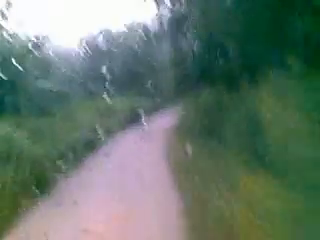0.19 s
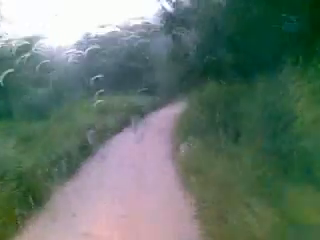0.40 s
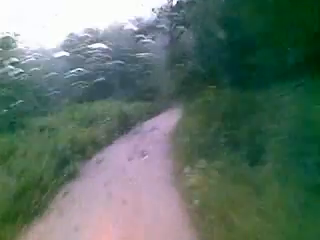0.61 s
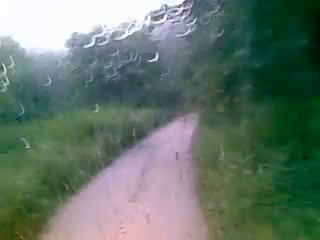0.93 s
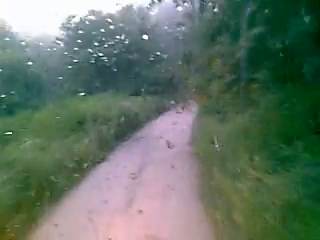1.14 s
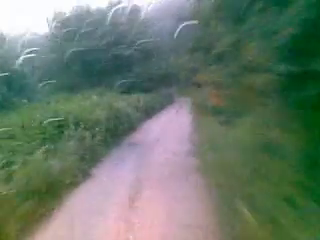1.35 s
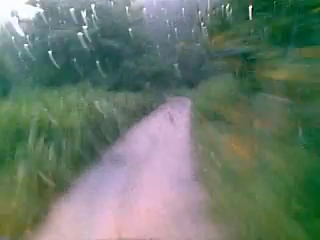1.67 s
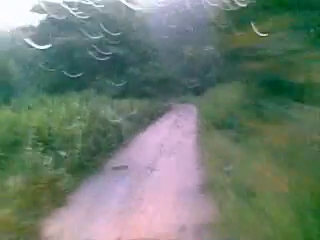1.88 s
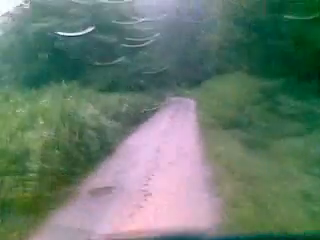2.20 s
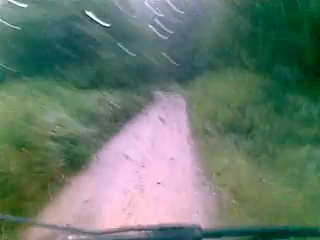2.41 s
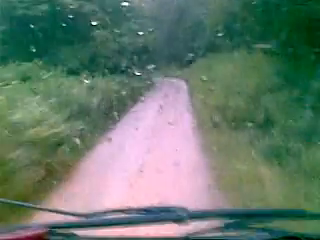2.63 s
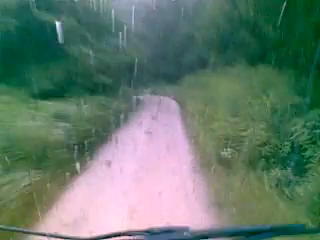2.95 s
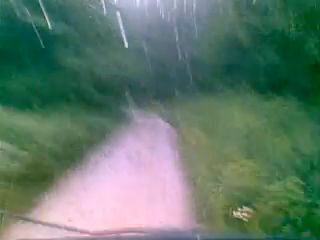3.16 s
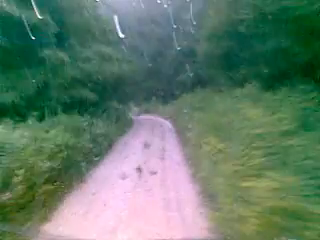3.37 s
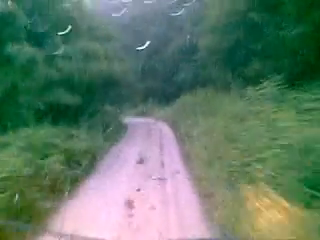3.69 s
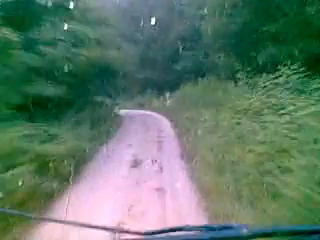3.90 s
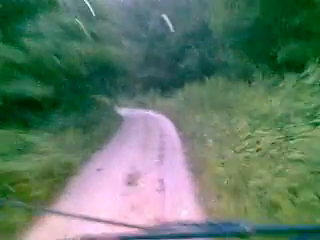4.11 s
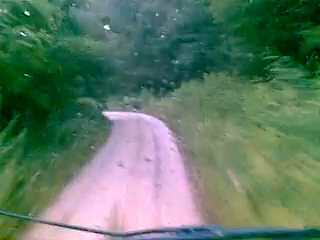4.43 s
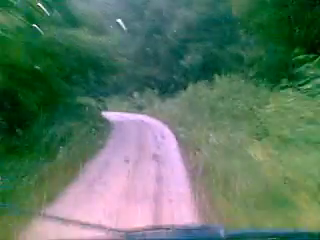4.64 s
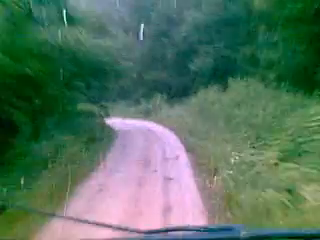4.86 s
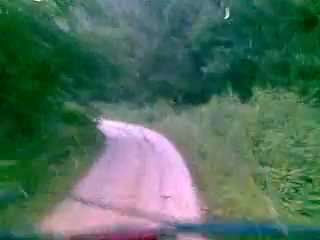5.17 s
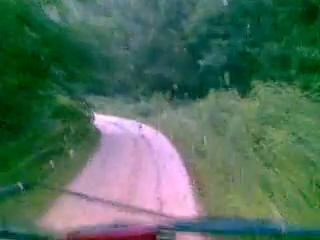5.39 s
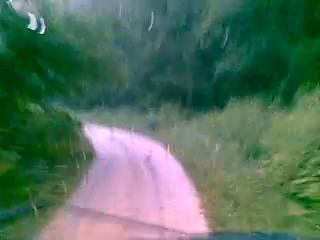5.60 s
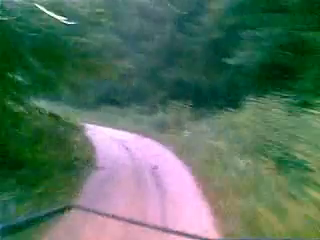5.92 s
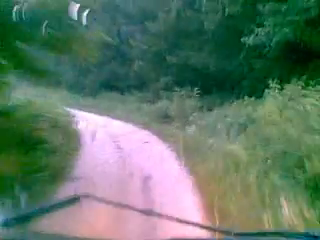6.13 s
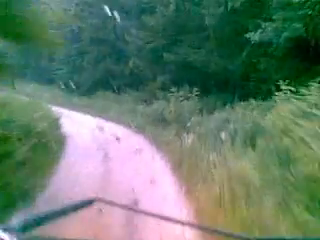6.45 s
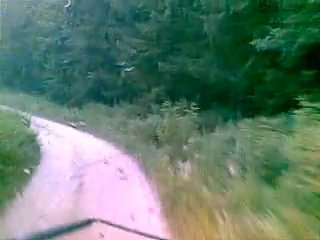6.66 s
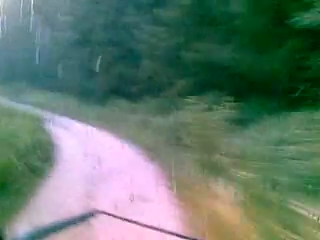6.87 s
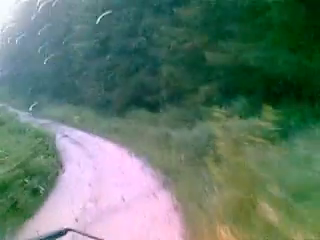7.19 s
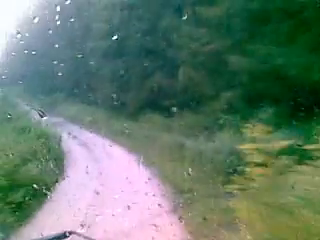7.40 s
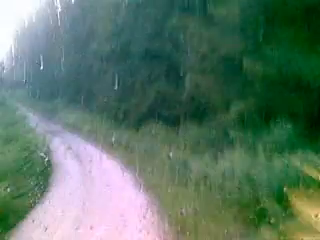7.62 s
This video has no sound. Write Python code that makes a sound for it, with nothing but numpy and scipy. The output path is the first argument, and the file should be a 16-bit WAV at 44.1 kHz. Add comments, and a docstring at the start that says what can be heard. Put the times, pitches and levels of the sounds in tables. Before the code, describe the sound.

A heavy diesel truck rumbles and clatters along a wet, rough track, heard from the cab with metal rattling and one pothole clunk.

```python
"""Inside the cab of a heavy diesel truck on a wet, rough forest track.
The cab booms with the crankshaft, gears whine, and the engine clatters, one injector knocking each
cycle until the throttle eases. The road roars and the wet tyres hiss. Bumps shake a loose metal
fitting and the cab trim, and something wet swishes over the body. Near the end come a faint squeal
in a bend and the clunk of one pothole."""
import sys
import numpy as np
from scipy import signal
from scipy.fft import rfft, irfft
from scipy.io import wavfile

SR = 44100
rng = np.random.default_rng(int(sys.argv[2]) if len(sys.argv) > 2 else 0)


def store_pcm(level_fs):
    """Save levels as 16-bit WAV."""
    pcm = np.round(np.clip(level_fs, -1, 1) * 32767).astype(np.int16)
    wavfile.write(sys.argv[1], SR, np.atleast_2d(pcm).T)


N = 344851
T = np.arange(N) / SR

# Each row: time in seconds, engine cycles per second (a cycle is two turns of the crankshaft).
ENGINE_SPEED = [(0.0, 11.33), (0.8, 11.153), (1.6, 10.989), (2.2, 10.876), (3.0, 10.855), (3.6, 10.875),
                (4.2, 10.871), (4.9, 10.898), (5.3, 10.86), (5.7, 10.575), (6.1, 10.327), (6.5, 10.42),
                (7.0, 10.34), (7.4, 10.24), (7.82, 10.2)]
# The injector knock follows how hard the engine works. Each row: time in seconds, level in dB.
KNOCK_LEVELS = [(0, -29.5), (1, -31), (1.4, -33), (2, -31.5), (2.4, -28.2), (2.85, -27.2), (3.2, -26.7),
                (3.75, -27.7), (4.2, -26.4), (5.1, -26.1), (5.35, -25.8), (5.55, -25.6), (5.65, -33),
                (5.85, -34), (6.1, -40), (6.6, -44), (7.82, -51)]
# The body shakes on its springs and the road roars through the cab panels.
# Each row: time in seconds, shake level in dB, roar level in dB.
SHAKE_AND_ROAR = [(0, -29.5, -36), (1.1, -25, -35.5), (1.5, -37, -38.5), (2, -32, -38), (3.1, -31, -37.5),
                  (3.5, -29.5, -35.5), (4.15, -32.5, -40), (4.85, -30, -37), (5.7, -24.5, -38),
                  (6.1, -37, -35.5), (7.2, -36.5, -38.5), (7.82, -22, -39.5)]
# Engine clatter and tyre spray. Each row: time in seconds, then the relative level of each in dB.
CLATTER_AND_SPRAY = [(0, -41, -54), (.6, -42.5, -55), (1.1, -43, -55.5), (1.8, -46, -59.5),
                     (2.3, -45.5, -56), (3.1, -43, -56), (3.7, -45, -58.5), (4.4, -43.5, -56.5),
                     (4.9, -42, -54.5), (5.4, -43, -52.5), (5.8, -43.5, -57.5), (6.2, -47, -57.5),
                     (6.7, -45.5, -60), (7, -44.5, -50.5), (7.3, -50.5, -56), (7.82, -48.5, -56)]


def gain_of(db):
    """Turns decibels (dB) into a number to multiply a sound by."""
    return 10 ** (np.asarray(db) / 20)


def evened(x):
    """Scales a signal so that its average strength (rms) is 1."""
    return x / np.sqrt(np.mean(x ** 2) + 1e-20)


def curve(rows, column=1):
    """Joins the points of a time table with straight lines, giving a value for every sample."""
    rows = np.asarray(rows)
    return np.interp(T, rows[:, 0], rows[:, column])


def add(mix, start, sound):
    """Adds a sound to the mix at a start time in seconds."""
    part = mix[max(round(start * SR), 0):][:len(sound)]
    part += sound[:len(part)]


def coloured(x, colour, size=16384):
    """Filters a sound by a colour: a table of how strong each frequency is next to the others."""
    hz, db = np.transpose(colour)
    log_gain = np.log(gain_of(np.interp(np.log(np.fft.rfftfreq(size, 1 / SR) + 1), np.log(hz), db)))
    cepstrum = irfft(log_gain)
    cepstrum[1:size // 2] *= 2  # folded in half, so the filter rings only after a hit
    cepstrum[size // 2 + 1:] = 0
    response = irfft(np.exp(rfft(cepstrum)))
    return signal.oaconvolve(x, response / np.linalg.norm(response))[:len(x)]


def noise(colour):
    """Steady noise of strength 1 in the given colour."""
    return evened(coloured(rng.standard_normal(N + SR), colour)[SR:])


def wander(rate):
    """A smooth random wobble of strength 1, moving up to about `rate` times a second."""
    hz = np.fft.rfftfreq(2 ** 19, 1 / SR)[:2 ** 14]
    spectrum = np.exp(2j * np.pi * rng.random(len(hz)) - np.minimum(hz / rate, 10) ** 2)
    return evened(irfft(spectrum, 2 ** 19)[:N])


def whistle(hz, width_hz, purity):
    """A tone that follows the pitch curve hz; the lower its purity (0 to 1), the more noise blurs it."""
    pole = np.exp(-np.pi * width_hz / SR)
    blur = rng.standard_normal(N) + 1j * rng.standard_normal(N)
    for _ in range(2):
        blur = signal.lfilter([1 - pole], [1, -pole], blur)
    strength = purity + (1 - purity) * blur / np.std(blur)
    return evened((strength * np.exp(2j * np.pi * np.cumsum(hz) / SR)).real)


def burst(t60, tail_db, tail_t60):
    """The noise of a blow, then the cab's short tail. A t60 is the seconds taken to fade by 60 dB."""
    t = np.arange(SR // 4) / SR
    return rng.standard_normal(len(t)) * (gain_of(-60 * t / t60) + gain_of(tail_db - 60 * t / tail_t60))


def cab_echo(x, echo_db, t60):
    """A sound plus its quick echoes off the glass and steel of the cab."""
    t = np.arange(SR // 5) / SR
    tail = rng.standard_normal(len(t)) * gain_of(-60 * t / t60) * (t > .003)
    return x + gain_of(echo_db) * signal.oaconvolve(x, tail / np.linalg.norm(tail))[:N]


def load_db():
    """How hard the engine works: 0 dB at its hardest, falling below that as the throttle eases."""
    return curve(KNOCK_LEVELS) - np.max(curve(KNOCK_LEVELS))


def engine_hum(cycles):
    """The cab's boom, the exhaust note and a higher drone, all swelling and sinking with the ride."""
    # Boom, exhaust note and the octave above that note. Each row: time in seconds, relative level in dB.
    boom_levels = [(0, -26), (.19, -24), (.4, -27.5), (.5, -25.5), (.76, -32), (.98, -20), (1.12, -28),
                   (1.22, -24), (1.32, -27), (1.43, -17), (1.58, -26), (1.78, -18), (2.08, -24.5),
                   (2.31, -33), (2.45, -22.5), (2.58, -28), (2.7, -21), (2.9, -33.5), (3.02, -24),
                   (3.11, -37), (3.2, -24.5), (3.44, -24.5), (3.57, -16.5), (3.74, -49), (3.9, -23),
                   (4.05, -25), (4.36, -24), (4.58, -32), (4.74, -29.5), (4.9, -39), (5.7, -29.5),
                   (6, -18.5), (6.12, -23), (6.23, -19.5), (6.5, -28.5), (6.72, -27), (6.8, -19),
                   (6.9, -15.5), (7.18, -23.5), (7.42, -18), (7.62, -25), (7.82, -24.5)]
    exhaust_levels = [(0, -38), (.57, -39.5), (3.13, -38.5), (3.24, -27.5), (3.59, -36.5), (4.27, -36),
                      (4.42, -52), (4.64, -37.5), (4.85, -48.5), (5.25, -29), (5.34, -57), (5.46, -33),
                      (5.64, -43), (5.97, -28), (6.1, -50), (6.32, -31), (6.49, -52), (6.84, -30.5),
                      (7.38, -40), (7.82, -37.5)]
    octave_levels = [(0, -46), (.4, -45), (.75, -41.5), (1.03, -41), (1.4, -44.5), (2.3, -50.5),
                     (2.7, -43.5), (3.03, -48), (3.17, -37), (3.4, -45.5), (4.1, -52), (4.5, -46),
                     (5.1, -47.5), (5.6, -47), (6, -39), (6.14, -48), (6.27, -39), (6.4, -43), (6.53, -40),
                     (6.7, -44), (7.2, -47.5), (7.5, -51.5), (7.82, -41)]
    # The tones of the drone. Each row: vibrations per engine cycle, relative level in dB.
    drone_tones = [(10, -7.5), (11, -6), (13, -5.5), (14, -3), (15, -9), (18, -3.5), (19, 1), (21, -3.5),
                   (22, -21), (23, -11.5), (24, -11.5), (29, -18), (30, -13.5), (31, -14)]
    angle = 2 * np.pi * cycles
    throb = 1 + .24 * gain_of(.4 * load_db()) * wander(11)  # jolts; steadier off the throttle
    cab_air = evened(np.sin(4.11 * angle + .36 * wander(6.8)))  # rings about four times a cycle
    boom = gain_of(curve(boom_levels) + 1.03) * throb * cab_air
    exhaust = np.zeros(N)
    for levels, multiple, wobble in (exhaust_levels, 8, .28), (octave_levels, 16, .25):
        tone = (1 + wobble * wander(9)) * np.sin(multiple * angle + .5 * wander(6))  # 8 firings a cycle
        exhaust += gain_of(curve(levels)) * evened(tone)
    sways = [wander(5.5) for _ in range(6)]
    brightness = gain_of(.33 * load_db())  # the top tones fade as the throttle eases
    drone = np.zeros(N)
    for multiple, db in drone_tones:
        swell, drift = (np.roll(sways[i], rng.integers(N)) for i in rng.permutation(len(sways))[:2])
        phase = multiple * angle + .5 * drift + 2 * np.pi * rng.random()
        tone = gain_of(db) * (1 + .55 * swell) * np.sin(phase)
        drone += tone * brightness if multiple > 17 else tone
    drone_db = curve(SHAKE_AND_ROAR, column=2) - 5  # just under the road roar
    return boom + exhaust + gain_of(drone_db) * evened(drone)


def roof_panel():
    """The engine makes the roof hum, at a pitch that follows its speed."""
    # Each row: time in seconds, level in dB.
    levels = [(0, -46), (1, -50.5), (1.15, -39.5), (1.39, -55.5), (1.61, -43.5), (1.91, -53.5), (2.28, -42),
              (2.57, -38.5), (2.68, -61), (3.05, -39), (3.2, -48), (3.7, -45), (4.2, -51), (4.4, -38.5),
              (4.5, -47), (4.88, -37), (5.07, -49.5), (5.49, -46), (5.6, -51), (6.05, -51), (7.82, -53.5)]
    speed = curve(ENGINE_SPEED)
    hz = 232.3 * speed / np.median(speed)
    return gain_of(curve(levels)) * whistle(hz, width_hz=35, purity=.76)


def engine_clatter(cycles):
    """Injectors and valves tap the same round every cycle; one injector knocks far louder under load."""
    # Each row: place in the cycle from 0 to 1, relative level of the tap in dB.
    tap_round = [(0.041, -5.5), (.088, 11.5), (.166, 8), (0.196, 6.5), (.232, 5), (.272, 10.5),
                 (.303, 12.5), (.382, 5.5), (.406, 11.5), (.453, 10.5), (.476, 10), (0.537, 0), (.6, 7),
                 (0.646, -0.5), (.69, 7), (.742, 12.5), (.81, 3.5), (.892, 12.5), (0.966, 12.5)]
    # Taps heard through the cab wall, and the dense wash of the other engine parts.
    # Each row: frequency in Hz, relative level in dB.
    tap_colour = [(200, -23.5), (450, -5.5), (600, -3), (800, -12), (930, 5), (1060, 6.5), (1280, -2),
                  (1430, -8.5), (1550, 1.5), (1750, -13.5), (2050, -5.5), (2600, -33), (3500, -42),
                  (6000, -44)]
    wash_colour = [(150, -21), (330, -2.5), (520, -0.5), (800, -2), (930, 1), (1100, -11.5), (1280, 3.5),
                   (1450, -6), (1750, -6), (2300, -13), (2850, -17.5), (3800, -22), (4900, -29.5),
                   (9000, -45)]
    cycle_numbers = np.arange(-1, int(cycles[-1]) + 1)
    taps, kicks = np.zeros(N), np.zeros(N)
    for place, db in tap_round:
        timing, size = rng.standard_normal((2, len(cycle_numbers)))
        at = np.searchsorted(cycles, cycle_numbers + place + .0021 * timing)
        heard = (at > 0) & (at < N)
        taps[at[heard]] += gain_of(db + .32 * size[heard])
    level_db = curve(CLATTER_AND_SPRAY)
    taps = coloured(evened(taps) * gain_of(level_db - 3.5 + .49 * load_db()), tap_colour)
    # Each knock rings the engine block for a few swings, with a little dry noise on top.
    knock_hz, rise_s = 1120, .0016
    at = np.searchsorted(cycles, cycle_numbers[1:])
    kicks[at] = gain_of(curve(KNOCK_LEVELS)[at] + .5 * rng.standard_normal(len(at)))
    t = np.arange(SR // 100) / SR
    swell = (t / rise_s * np.exp(1 - t / rise_s)) ** 4
    contact = .15 * signal.oaconvolve(kicks, swell)[:N] * noise(tap_colour)
    block_ring = signal.oaconvolve(kicks, swell * np.sin(2 * np.pi * knock_hz * t))[:N]
    flicker = 1 + .057 * wander(31)
    taps = cab_echo(taps, echo_db=-7.5, t60=.12)
    wash = gain_of(level_db - 3) * evened(flicker * noise(wash_colour))
    return contact + block_ring + taps + wash


def gear_whines():
    """The gearbox and axles whine, sinking in pitch as the truck slows."""
    # One list for each whine. Each row: time in seconds, pitch in Hz, level in dB.
    whines = [
        [(0, 1072, -49), (1.1, 1061, -53.5), (1.6, 1050, -55), (2.1, 1025, -71)],
        [(1.5, 926, -64), (2.3, 924.6, -53), (4, 928, -53), (5.5, 933, -51), (6.1, 912, -63), (6.5, 918, -59),
         (6.72, 922, -51), (7.15, 911, -51.5), (7.55, 902, -57), (7.82, 900, -56)],
        [(5.3, 1245, -86), (5.78, 1235, -49.5), (6.08, 1205, -66), (6.22, 1222, -54), (6.35, 1195, -60),
         (6.65, 1192, -57), (7, 1172, -62), (7.5, 1161, -60.5), (7.82, 1158, -58)],
        [(5.4, 1000, -80), (5.75, 990, -55), (6.15, 960, -56), (6.55, 955, -62), (7, 948, -65)],
        [(5.6, 663.5, -69), (5.85, 660, -56.5), (6.05, 668, -62), (6.22, 665, -66), (6.32, 662, -50.5),
         (6.45, 660, -54), (6.55, 657, -57.5), (6.85, 652, -54.5), (7.2, 648, -65), (7.82, 636, -70)],
        [(5.3, 330, -63), (5.9, 323, -53.5), (6.6, 321, -62), (7.1, 315, -65), (7.82, 309, -64)],
    ]
    # One number for each whine: its share of clean tone at full load, from 0 to 1.
    purities = [.64, .54, .56, .52, .64, .5]
    clearing = -.007 * load_db()  # the tones grow cleaner as the throttle eases
    out = np.zeros(N)
    for rows, purity in zip(whines, purities):
        sounding = (T >= rows[0][0]) & (T <= rows[-1][0])
        tone = whistle(curve(rows), width_hz=60, purity=purity + clearing)
        out += sounding * gain_of(curve(rows, column=2)) * tone
    return out


def wet_road():
    """Body shake and road roar jolt together, while the tyres crunch wet grit and throw up spray."""
    # The colour of each noise. Each row: frequency in Hz, relative level in dB.
    shake_colour = [(10, -41.5), (17, 12.5), (28, 13), (37, 9), (55, 2), (90, -56), (200, -91)]
    roar_colour = [(20, -16.5), (45, -9), (58, 8.5), (72, -2.5), (100, 2.5), (140, -2), (190, -7),
                   (245, -11.5), (290, -15), (370, -34.5), (600, -52.5), (1500, -48), (8000, -70)]
    grit_colour = [(250, 2), (600, 0.5), (1200, 1), (1700, -1.5), (2350, -2.5), (2900, -11), (3900, -14.5),
                   (4900, -30), (8000, -46.5)]
    spray_colour = [(2500, -16), (5000, 10.5), (6300, 13), (8300, 11), (10300, 4.5), (11500, -27),
                    (12900, -16), (14500, -29), (15700, -30)]
    jolts = wander(6.2)
    shake = gain_of(curve(SHAKE_AND_ROAR) + 1.2 * jolts) * noise(shake_colour)
    roar = gain_of(curve(SHAKE_AND_ROAR, column=2) + 1.25 * jolts) * noise(roar_colour)
    grit = gain_of(-50.5 + wander(39)) * noise(grit_colour)
    spray = gain_of(curve(CLATTER_AND_SPRAY, column=2) - 14 + 2.8 * wander(22)) * noise(spray_colour)
    return shake + roar + grit + spray


def mist():
    """Fine mist and rain hiss on the glass."""
    # Each row: time in seconds, level in dB.
    levels = [(0, -64.5), (1.8, -67), (3, -65), (4.5, -66), (5.2, -62.5), (5.8, -61), (6.3, -63.5),
              (7, -61), (7.45, -67.5), (7.82, -64)]
    # Each row: frequency in Hz, relative level in dB.
    colour = [(2000, 2.5), (5000, -6), (6500, 2.5), (8500, 2), (11000, -.5), (12800, 2.5), (14500, -3.5),
              (15700, 0.5)]
    return gain_of(curve(levels) + .5 * wander(30)) * noise(colour)


def loose_fitting():
    """A loose metal fitting hops: each landing is a dry knock, a click and a slightly different ring."""
    # Each row: start in seconds, relative knock level in dB, relative ring level in dB.
    hops = [(0.01, -46, -52), (0.05, -48, -57), (0.069, -51, -63), (0.1, -50, -51), (0.122, -47, -50),
            (0.178, -48, -47.5), (0.213, -48, -62), (.236, -55, -64), (.339, -48, -63), (0.365, -43.5, -65),
            (0.405, -44, -58), (0.443, -47, -56), (0.478, -44, -48), (0.5, -44.5, -59), (0.545, -48, -50.5),
            (0.564, -47, -51), (0.587, -43.5, -54), (0.801, -51, -59), (0.861, -42, -52), (0.952, -44, -52),
            (0.974, -42, -53), (0.994, -43, -50.5), (1.035, -49, -62), (1.052, -61, -64),
            (1.213, -42.5, -53.5), (1.238, -56, -59), (1.374, -42.5, -52), (1.501, -44, -54),
            (1.588, -49, -63), (1.607, -47, -62), (1.64, -43, -57), (1.664, -43.5, -59), (1.681, -57, -62),
            (1.904, -44, -63), (2.192, -46.5, -58), (2.367, -43, -54), (2.774, -49, -54.5),
            (3.024, -43.5, -56), (3.18, -48, -58), (3.892, -42.5, -50), (4.959, -47, -56),
            (5.072, -45.5, -47), (5.503, -46.5, -57), (5.883, -56, -62), (6.248, -48, -69),
            (6.429, -56, -63)]
    # The metal's own tones. Each row: pitch in Hz, relative level in dB, seconds to fade by 60 dB.
    metal_tones = [(2080, 16, 0.022), (2230, 12, 0.021), (3100, -5.5, .035), (3480, -7, 0.035),
                   (4010, -11, 0.041), (4450, -18, .03), (5550, -7, 0.12), (5523, 1.5, 0.037),
                   (5610, 1, 0.028), (6360, -5, 0.054), (7330, -19, 0.036), (10000, -21, .035),
                   (11800, -16, .03), (13720, -12, 0.036)]
    # Each row: frequency in Hz, relative level in dB.
    knock_colour = [(700, -6), (1500, 6), (1800, 1.5), (2100, 2), (2400, 3), (2800, -7.5), (3500, -4),
                    (4200, -9), (4900, -21), (6300, -17), (9000, -23), (13500, -26), (15700, -42)]
    t = np.arange(SR // 4) / SR
    attack = 1 - np.exp(-t / .0009)
    rings, knocks = np.zeros(N), np.zeros(N)
    for start, knock_db, ring_db in hops:
        for hz, db, t60 in metal_tones:
            extra_db, detune, stretch = rng.standard_normal(3) * (1.6, .005, .14)
            fade = gain_of(ring_db + db + extra_db - 60 * t / (t60 * np.exp(stretch)))
            add(rings, start, fade * attack * np.sin(2 * np.pi * hz * (1 + detune) * t))
        add(knocks, start, gain_of(knock_db - 1) * burst(t60=.084, tail_db=-9.5, tail_t60=.28))
        add(knocks, start + .0015, gain_of(knock_db + 21) * np.ones(1))  # it clicks into its seat
    chatter = 1 + .55 * wander(170)  # it buzzes against the seat while it rings
    return rings * chatter + coloured(knocks, knock_colour)


def pings():
    """Tiny hard touches, perhaps grit on the bodywork, each ringing around one high pitch."""
    # Each row: start in seconds, pitch in Hz, level in dB.
    touches = [(.776, 7300, -55), (1.127, 11200, -61), (1.331, 14500, -57)]
    t60 = .06
    t = np.arange(SR // 8) / SR
    out = np.zeros(N)
    for start, hz, db in touches:
        band = signal.butter(2, [hz * .95, hz * 1.05], "band", fs=SR)
        ring = evened(signal.lfilter(*band, rng.standard_normal(len(t))))
        add(out, start, gain_of(db - 60 * t / t60) * ring)
    return out


def trim_rattles():
    """Bumps shake short, dry rattles out of the cab trim."""
    # Each row: start in seconds, level in dB.
    rattles = [(1.989, -44), (2.144, -48), (3.045, -45), (6.965, -53), (6.995, -51), (7.035, -41.5),
               (7.11, -46), (7.158, -47), (7.199, -48), (7.226, -46), (7.252, -43.5), (7.399, -45.5),
               (7.501, -50)]
    # Each row: frequency in Hz, relative level in dB.
    colour = [(300, -5), (1400, 1), (2000, 5), (2400, 3.5), (2900, -5), (4000, -7.5), (5000, -20),
              (7500, -19), (12000, -28), (16000, -37)]
    out = np.zeros(N)
    for start, db in rattles:
        add(out, start, gain_of(db) * burst(t60=.047, tail_db=-8, tail_t60=.3))
    return coloured(out, colour)


def wet_swish():
    """Something wet spatters over the cab, brightening up to one sharp slap while a body panel hums."""
    # Each row of both: frequency in Hz, relative level in dB.
    spatter_colour = [(200, 7), (380, 5), (560, 4), (700, -1), (950, 0), (1300, 3), (2400, -7),
                      (3500, -4.5), (4800, -12), (8000, -14), (14000, -22), (15700, -22)]
    slap_colour = [(500, 12), (2500, -7), (3450, 6), (4600, -6), (8000, -17), (15700, -18)]
    start_s, slap_s, release_s = 2.028, 2.0695, 2.08
    attack_s, t60 = .0031, .064
    attack = np.clip((T - start_s) / attack_s, 0, 1)
    envelope = attack * gain_of(-60 * np.clip((T - release_s) / t60, 0, 2))
    grains = evened(gain_of(2.5 * wander(2500)) * rng.standard_normal(N))
    bright = coloured(envelope * grains, spatter_colour)
    dull = signal.lfilter(*signal.butter(1, 3500, fs=SR), bright)
    brightness = np.clip((T - start_s) / (slap_s - start_s), 0, 1)
    spatter = gain_of(-39) * (dull + brightness * (bright - dull))
    panel = gain_of(-44.5) * envelope * whistle(hz=np.full(N, 510), width_hz=200, purity=.55)
    slap = np.zeros(N)
    add(slap, slap_s - .001, gain_of(-30.5) * burst(t60=.012, tail_db=-30, tail_t60=.05))
    return spatter + panel + coloured(slap, slap_colour)


def tyre_scrub():
    """The tyres rub over wet grit through the bend."""
    # Each row: time in seconds, level in dB.
    levels = [(4.3, -73), (5, -57), (5.7, -54.5), (6.3, -58.5), (7.05, -55), (7.35, -65), (7.82, -69)]
    # Each row: frequency in Hz, relative level in dB.
    colour = [(500, -28), (1600, -7.5), (2000, -1.5), (2400, -1), (2900, -13.5), (5000, -33), (10000, -55)]
    return gain_of(curve(levels) + 1.3 * wander(40)) * noise(colour)


def squeal():
    """One faint, thin tone with a trembling pitch, perhaps a dragging brake."""
    # Each row: time in seconds, pitch in Hz, level in dB.
    path = [(6.33, 3215, -82), (6.44, 3260, -73), (6.66, 3200, -65), (6.83, 3238, -68), (6.95, 3250, -80)]
    hz = curve(path) * (1 + .005 * wander(45))
    tone = evened(np.sin(2 * np.pi * np.cumsum(hz) / SR))
    sounding = (T >= path[0][0]) & (T <= path[-1][0])
    return sounding * gain_of(curve(path, column=2)) * tone


def pothole():
    """A pothole gives a crack and a tight cluster of blows; each thuds and rings the body panels."""
    # Each row: start in seconds, relative level in dB.
    blows = [(6.9136, -24.5), (6.9162, -21.5), (6.9192, -23), (6.9235, -27), (6.9305, -29.5)]
    # Each row: pitch in Hz, relative level in dB, seconds to fade by 60 dB.
    panel_tones = [(167, -12, .14), (269, -2.5, 0.1), (426, -4, 0.049), (515, -13, 0.051), (710, -7, .04),
                   (846, -12, .15), (1383, -2, 0.035), (1930, -4, 0.04), (2160, 0.5, 0.074),
                   (2420, -18, 0.29), (3440, -16, 0.035), (3800, -11, 0.025), (6660, -28, .07),
                   (7260, -31, .09)]
    # Each row: frequency in Hz, relative level in dB.
    thud_colour = [(120, 8), (220, 17), (330, -4), (480, 9), (750, 3), (1050, 0.5), (1330, -6), (1600, -5),
                   (2100, 4), (2450, -4), (2950, -17), (3550, -12.5), (4700, -23), (6500, -14.5),
                   (9000, -32), (15000, -45)]
    t = np.arange(SR // 3) / SR
    thuds, rings, crack = np.zeros((3, N))
    for start, db in blows:
        add(thuds, start, gain_of(db - 2.5) * burst(t60=.04, tail_db=-22, tail_t60=.3))
        for hz, tone_db, t60 in panel_tones:
            fade = gain_of(db - 11.5 + tone_db - 60 * t / t60)
            add(rings, start, fade * np.sin(2 * np.pi * (hz * t + rng.random())))
    add(crack, blows[0][0], gain_of(-42) * burst(t60=.0089, tail_db=-30, tail_t60=.05))
    return crack + coloured(thuds, thud_colour) + rings


def scene():
    """Mixes engine, road and bumps into one channel. A running count of cycles times the engine."""
    first_knock_s = .0545
    cycles = np.cumsum(curve(ENGINE_SPEED)) / SR
    cycles -= np.interp(first_knock_s, T, cycles)
    engine = engine_hum(cycles) + roof_panel() + engine_clatter(cycles) + gear_whines()
    road = wet_road() + mist() + tyre_scrub()
    events = loose_fitting() + pings() + trim_rattles() + pothole() + wet_swish() + squeal()
    return (engine + road + events)[None]


def record(dry):
    """Fades both ends quickly and cuts off the very highest treble."""
    fade_s, cutoff_hz = .012, 15720
    fade = np.sin(np.pi / 2 * np.clip(np.minimum(T, T[-1] - T) / fade_s, 0, 1)) ** 2
    low_pass = signal.firwin(1023, cutoff_hz, window=("kaiser", 9), fs=SR)
    return signal.oaconvolve(dry * fade, low_pass[None], "same")


dry = scene()
out = record(dry)
store_pcm(out)
```